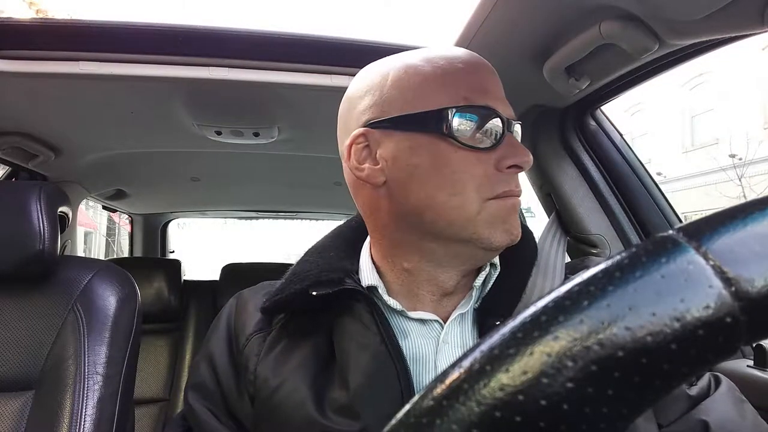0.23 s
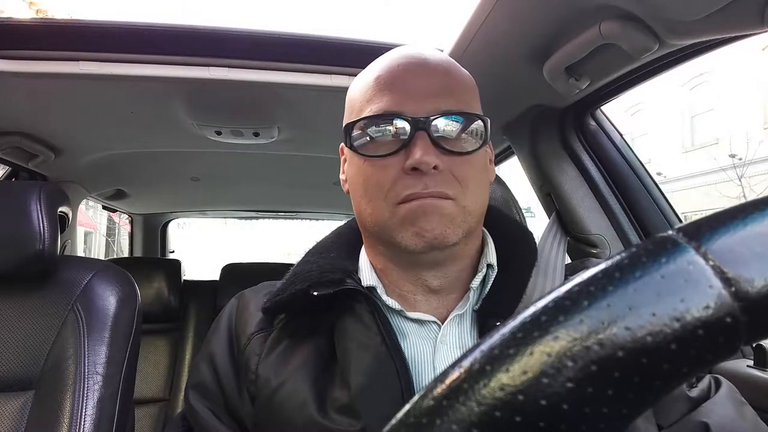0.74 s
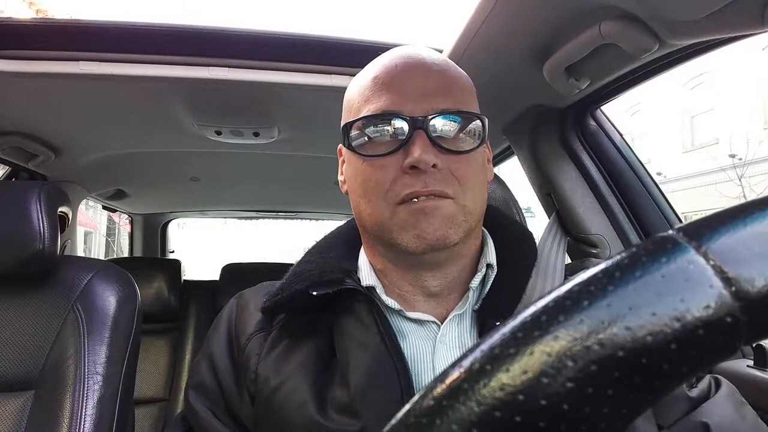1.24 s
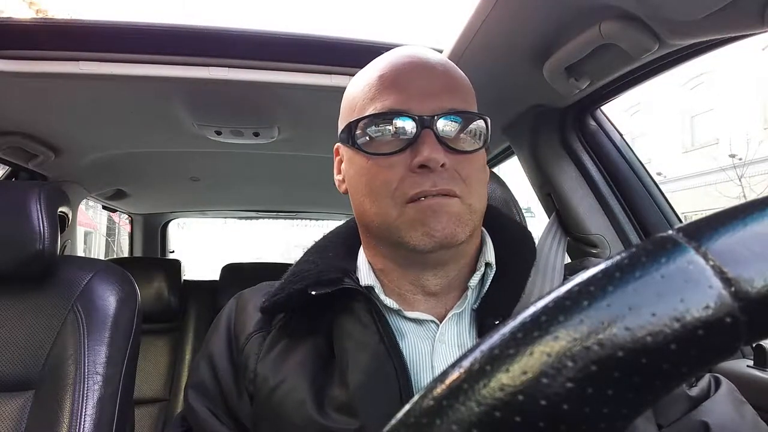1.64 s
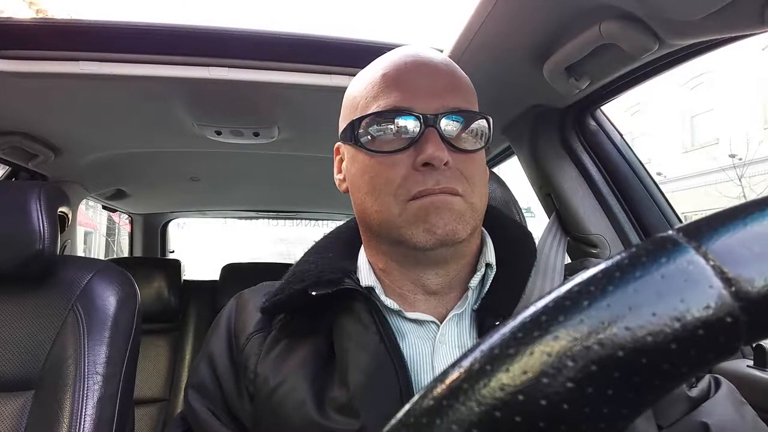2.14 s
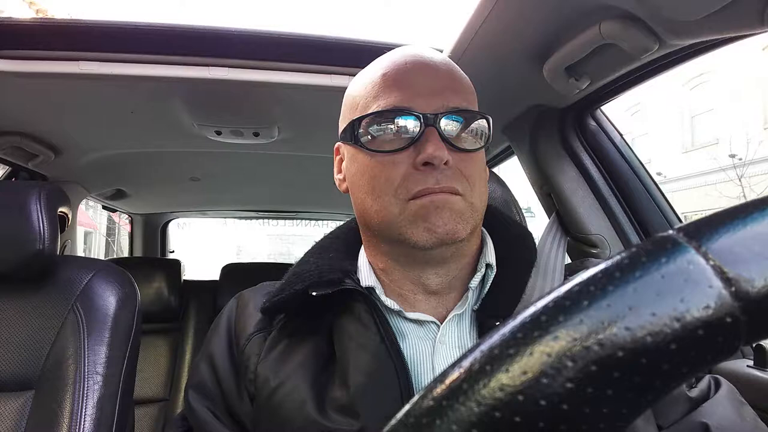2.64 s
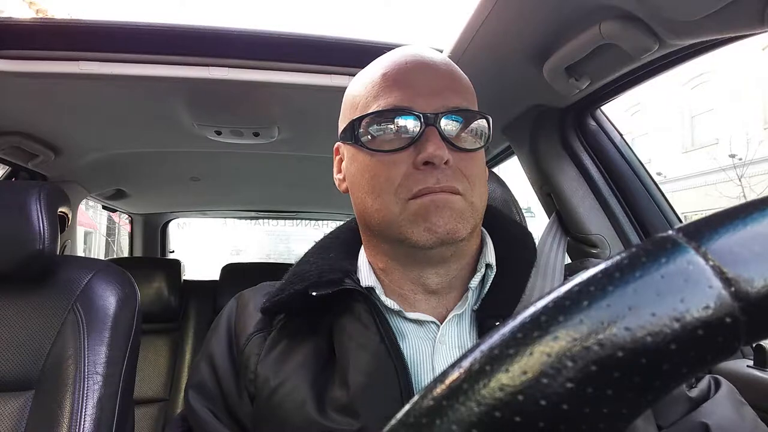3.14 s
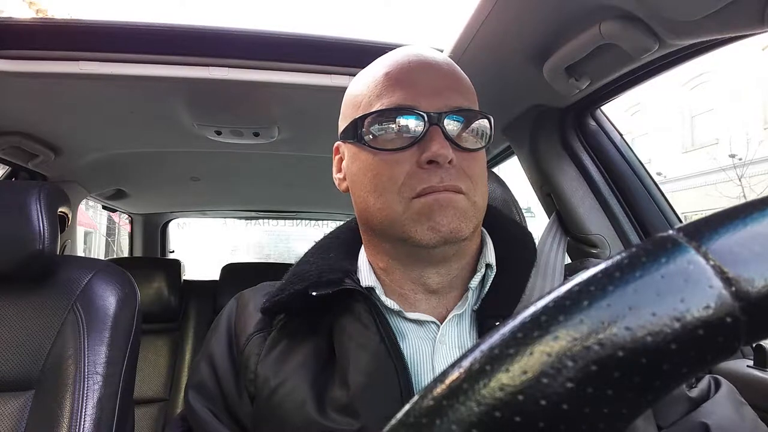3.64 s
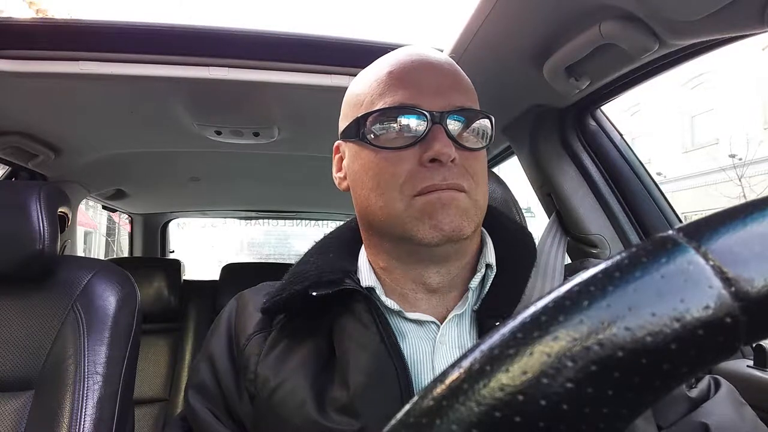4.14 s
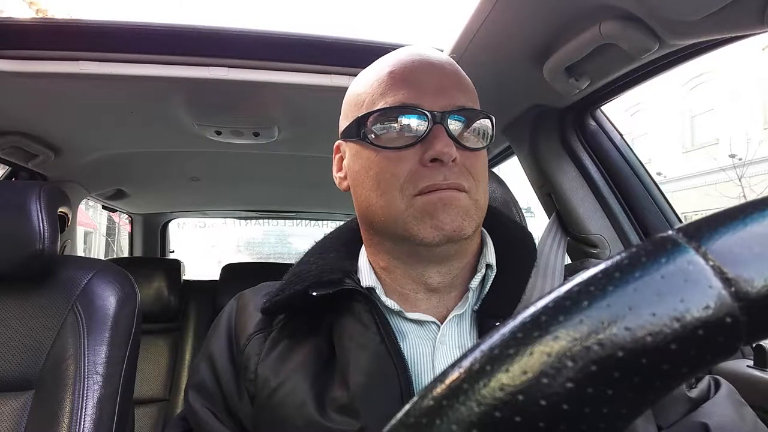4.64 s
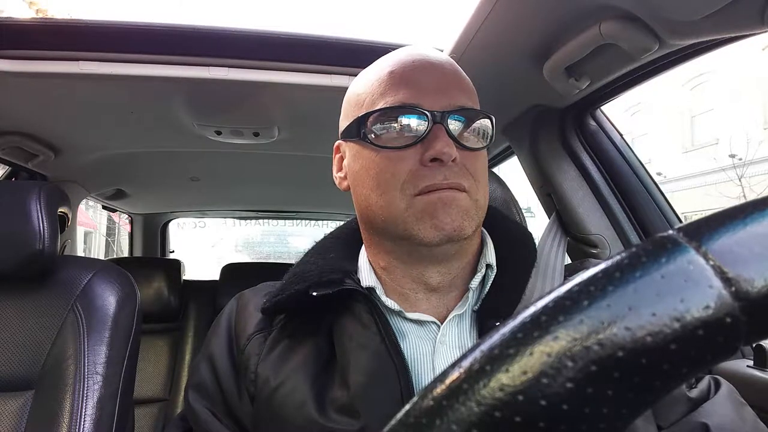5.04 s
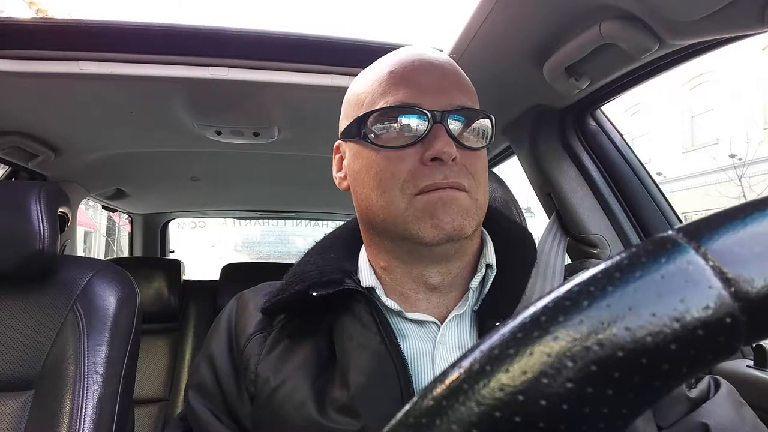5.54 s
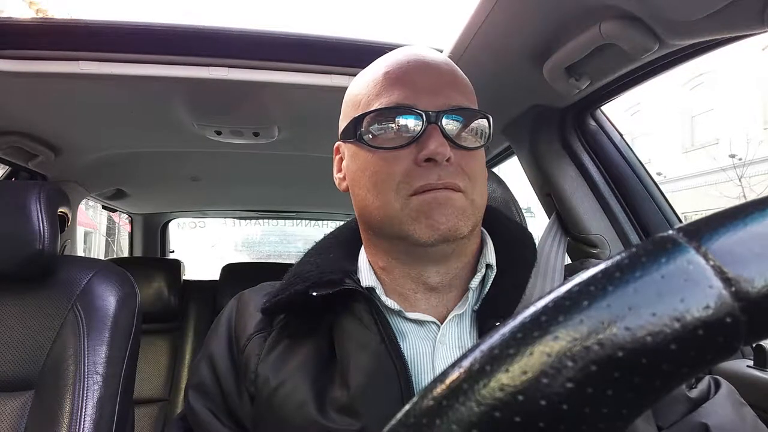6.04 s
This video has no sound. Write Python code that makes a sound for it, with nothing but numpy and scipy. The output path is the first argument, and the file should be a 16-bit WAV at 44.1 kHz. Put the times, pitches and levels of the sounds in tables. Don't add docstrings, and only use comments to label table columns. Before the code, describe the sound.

Inside a parked car with an open window, a pneumatic breaker hammers the road nearby, already running at 0 s and lasting to about 6.3 s. Blows come about nineteen a second, slightly uneven in strength: a bright, ringing steel crack with a sharp spit of exhaust air, a lighter piston knock some 20 ms before it, and a low thud and boom in the cabin. Panels, door and window glass rattle and buzz. Around 1.1 s two blows weaken, a gap of under 0.2 s follows, and at 1.36 s the hammering resumes. From 3 s the top rings more freely and the blows sound deeper-set; from 5.6 s they slow to about sixteen a second, brighter and thinner. Street echo fills the gaps; a faint diesel drone swells near 3.5 and 4.5 s over distant town rumble. Small stereo microphone, tool slightly left.

```python
import sys
import numpy as np
from scipy import signal
from scipy.fft import rfft, irfft, next_fast_len
from scipy.io import wavfile

SR = 44100
rng = np.random.default_rng(int(sys.argv[2]) if len(sys.argv) > 2 else 0)


def gain_from_db(level_db):
    decades = np.asarray(level_db, float) / 20
    return 10 ** decades


def transcribe(u):
    v = np.clip(np.atleast_2d(u).T, -1, 1)
    q = np.round(v * 32767).astype(np.int16)
    wavfile.write(sys.argv[1], SR, q)


N = 277560

PAD = int(0.6 * SR)
SIZE = next_fast_len(N + PAD)
HZ = np.arange(SIZE // 2 + 1) * SR / SIZE + 1e-3
KNOCK_LEAD_S, PORT_LAG_S = 0.0215, 0.0002145
STREET_T60_S, TOP_T60_S, CABIN_T60_S = 0.44, 0.15, 1
TREBLE_ALIKE = 0.52
SHARED = rfft(rng.standard_normal(SIZE))
TURNS = np.interp(HZ, 450 * np.arange(50), 2.0 * rng.standard_normal(50)) / (1 + (1500 / HZ) ** 2)
OWN = rng.standard_normal((2, SIZE))


def filt(x, response):
    return irfft(rfft(x, SIZE) * response, SIZE)


def delay(s):
    return np.exp(-2j * np.pi * HZ * s)


def peak(hz, width):
    return 1j * HZ * width / (hz ** 2 - HZ ** 2 + 1j * HZ * width)


def body(modes):
    total = 0
    for k, (hz, width, *db) in enumerate(modes):
        total = total + (-1) ** k * gain_from_db(np.array(db))[:, None] * peak(hz, width)
    return total


def colour(points):
    hz, db = np.transpose(points)
    return gain_from_db(np.interp(np.log(HZ), np.log(hz), db))


def level(x, db):
    return x * gain_from_db(db) / np.sqrt(np.mean(x ** 2))


def mean_db(db):
    return 10 * np.log10(np.mean(gain_from_db(db) ** 2))


def at(s, curve):
    when, *columns = np.transpose(curve)
    return [np.interp(s, when, c) for c in columns]


def common():
    drift_hz, drift_above_hz = 0.3374, 1900
    left = SHARED * np.exp(1j * TURNS)
    high = 1 / (1 + (drift_above_hz / HZ) ** 4)
    turn = 2 * np.pi * drift_hz * np.arange(SIZE) / SR
    paths = [left * (1 - high), left * high, 1j * left * high, SHARED * delay(PORT_LAG_S)]
    low, treble, shifted, right = irfft(paths, SIZE)
    return np.array([low + np.cos(turn) * treble + np.sin(turn) * shifted, right])


def pair(alike, shared):
    noise = np.sqrt(alike) * shared + np.sqrt(1 - alike) * OWN
    return np.roll(noise, rng.integers(SIZE), axis=1)


def ports():
    return np.array([delay(0), delay(PORT_LAG_S)])


def train(times, db):
    x = np.zeros(SIZE)
    x[np.round(times * SR).astype(int) + PAD] = gain_from_db(db)
    return x


def burst(clicks, rise_s, fall_s):
    rise, fall = np.exp(-1 / (rise_s * SR)), np.exp(-1 / (fall_s * SR))
    return signal.lfilter([1 - rise], np.convolve([1, -rise], [1, -fall]), clicks)


def street(clicks, t60):
    return np.sqrt(np.abs(burst(clicks ** 2, 0.043, t60 / np.log(1e6))))


def diesel():
    cycle_hz, steady_db = 14.45, -29
    # multiple of the cycle rate, level in dB
    lines = [(2, -28), (3, -8), (4, -5), (5, -12.5), (6, -6), (8, -6)]
    # time in seconds, level of the lowest firing lines in dB
    load = [
        (0, -29),
        (1, -34),
        (1.3, -31),
        (2.3, -42),
        (3.5, -24.5),
        (4.3, -31),
        (4.55, -22.5),
        (4.85, -30),
        (6.29, -27),
    ]
    wander = filt(rng.standard_normal((len(lines) + 1, SIZE)), 1 / (1 + 1j * HZ / 0.47) ** 2)
    wander /= wander.std()
    load_db, = at((np.arange(SIZE) - PAD) / SR, load)
    phase = 2 * np.pi * np.cumsum(cycle_hz * (1 + 0.0063 * wander[0])) / SR
    out = 0
    for (k, db), w in zip(lines, wander[1:]):
        line_db = db + (load_db if k < 5 else steady_db) + 1.5 * w
        out = out + gain_from_db(line_db) * np.sqrt(2) * np.sin(k * phase + k ** 2)
    return out


def traffic(shared):
    # frequency in Hz, level in dB per Hz
    rumble = [(20, -33), (60, -19), (150, -22), (300, -15), (700, -19.5), (1500, -26), (8000, -41),
              (15000, -77)]
    return level(filt(pair(1.0, shared), colour(rumble)), -37)


def strikes():
    # time in seconds, crack over the force in dB, thud over the force in dB
    early = [(0.0336, 6.5, 0), (0.088, 2, 4.5), (0.1399, 0, 2), (0.1916, 5, -1), (0.2448, -1, 2),
             (0.2972, -4, -0.5), (0.348, 0.5, -2), (0.4016, -3, 0.5), (0.4534, -6, 2.5), (0.5052, -2, 2),
             (0.5606, -2, 0.5), (0.6114, -1.5, -0.5), (0.6653, -2, 1), (0.718, -8, -2), (0.7699, 6, -0.5),
             (0.824, -4, -5), (0.8813, -2, 2), (0.93, -3, 0.5), (0.984, 0, -1), (1.0373, 2.5, 2),
             (1.0957, -16, -2), (1.1743, -16, 2), (1.3632, 4.5, 1.5), (1.419, -9, -0.5), (1.471, -9, 2.5),
             (1.5208, -3, 0.5), (1.5732, 0, -0.5), (1.6239, 6, 3), (1.6774, 3, 2), (1.7278, -3, 4.5),
             (1.7801, 1, -2.5), (1.8313, 4.5, 2.5), (1.8834, -4, 4), (1.9344, 0, 1), (1.9879, -2, 3),
             (2.0405, -2, -6), (2.0929, -3, 1), (2.147, -6, -2), (2.199, -3, 0), (2.25, 5, 1),
             (2.3048, -3, 1.5), (2.3558, -6, 3.5), (2.4071, -4, 1.5), (2.4599, -2, 1.5), (2.514, -6, 2.5),
             (2.565, 2.5, -1), (2.6176, -7, 0), (2.671, -8, 0.5), (2.7207, 3, -1.0), (2.773, -2, -3),
             (2.8239, -7, 4), (2.877, 3, 1.5), (2.9274, 3, 2), (2.9799, -6, 0.5), (3.0312, -9, -0.5),
             (3.0823, -2, -2), (3.1332, 4, 1), (3.1846, -2.5, 0.0)]
    # time in seconds, crack over the force in dB, thud over the
    # force in dB
    late = [(3.2388, -4, 3), (3.2912, 5.5, -2), (3.341, -3, 0.0), (3.3933, -3.5, 0.5), (3.4448, 1, -3),
            (3.4954, 1, 0), (3.5472, -9, -2), (3.5987, -9, 0.5), (3.6498, -2, 1.5), (3.7024, -1.5, -0.5),
            (3.7561, -7, 0), (3.8076, -8, -6), (3.8607, -17, -2), (3.912, -1, 0), (3.9648, -8, 0),
            (4.0168, 2, 0), (4.07, -2, 1), (4.1237, -3, -1.5), (4.176, 5, 3), (4.229, 4.5, 0.5),
            (4.2825, -6, 3), (4.337, -7, 2.5), (4.3929, 4, 1.5), (4.4482, -0.5, 0), (4.5017, -6, 2.5),
            (4.5553, 0, 1), (4.6096, -5, 2.5), (4.6651, 6, 2), (4.7179, -3.5, 3), (4.7724, -3, -1),
            (4.825, 3, 2.5), (4.8789, 1, 2), (4.9329, 2, 0), (4.9882, 1, 3), (5.043, -5, -0.5),
            (5.0999, -7, 0), (5.1557, 1, 0.5), (5.2103, 1, 1), (5.2618, 3, -2), (5.3176, -8, 0),
            (5.3726, -3.5, 1.5), (5.4254, -5, -1.5), (5.4801, 2, -0.5), (5.5374, -6, 1), (5.5899, -9, -1.5),
            (5.6541, -4, 3.5), (5.7139, -10.5, -0.5), (5.7755, -7.5, -0.5), (5.8369, 0, 2.5),
            (5.9002, -11, 1.5), (5.9608, -6, 3.5), (6.0201, -12, 4.5), (6.0882, -2, 4.5),
            (6.1451, -5.5, 2.5), (6.2215, 0, 3), (6.2796, 3, 2.5)]
    s, crack_db, thud_db = np.transpose(early + late)
    before = np.arange(10, 0, -1)
    run_in = s[0] - (s[1] - s[0]) * before
    return np.r_[run_in, s], np.r_[0 * before, crack_db], np.r_[0 * before, thud_db]


def knocks():
    # knock lead in ms, knock in dB, window pane in dB
    early = [(18.6, 1.0, -7), (23.3, -1, -9), (20.5, -1.0, -3.5), (19.9, 0, 0.5), (20.8, -6, 1),
             (18.7, -1, 3), (17.8, -1, 3.5), (21.3, 1, -1), (22.2, 3.5, -8), (21.7, 1, -0.5), (23.4, -2, 0),
             (22.4, -2, 0), (22, -0.5, -2), (21.7, -3, 1), (20.2, 1.0, -1), (23.8, 0, -3.0), (21.8, -3, 2),
             (20.5, -3, 1.5), (20.1, 1.0, -3.0), (20.9, 2, -3.5), (25.4, 2.5, -5), (22.8, -19, -5.0),
             (24.9, -18, 0), (23.5, 1, 2.5), (21.4, 2, 1.5), (18.0, 3, 0), (18.2, 3, -2.5), (19.3, 2, 4),
             (22.5, -4, -1.5), (19.6, -6, -9), (21.5, 0, 1.5), (17.8, -2, -2.0), (19.4, 3, -7),
             (19.3, -1.0, 1), (21.3, 2.5, 1), (18.9, 5, 1.5), (22, 4, -1), (22.7, 2.5, -0.5), (20.6, 2, 2),
             (18.7, 0, 2.5), (22.3, 1, 1), (20.4, -1, 1), (18.4, -1, 2.0), (19.7, 1, 4.5), (23.4, -0.5, 4),
             (19.6, 2, 6), (22.3, -8, 7), (23.3, -2, 3.5), (19.6, -4, -3), (20.3, 2, 3.5),
             (18.2, -0.5, 3.5), (21.9, 2, 3), (19.1, -5, 4), (20.8, -5, 4), (19.5, 1.0, 4), (21.5, 0, 2),
             (18.4, 3, 1.0), (17.8, -3, 3)]
    # knock lead in ms, knock in dB, window pane in dB
    late = [(22.3, 1, 3.5), (21.6, 0, 2), (18.0, -0.5, 3), (20.4, -4, -1), (19.3, -1, 2.5), (19.6, -6, -6),
            (21.1, -3, 3), (21.9, 1.5, 3.0), (20.3, 2, 4), (21.6, 3.5, -11), (21.3, 5, 3), (20.1, -1, -4.0),
            (21, 4.5, 7), (20.8, 2, 6), (21.2, 1, 1.5), (21.6, 0, -1), (22.7, -2.0, 5.5), (22.3, 2.0, -14),
            (21.5, 2, -5), (20.9, 1.5, -5), (22.5, -3, 1.5), (23.1, 1, 2.5), (23.2, 1, -0.5),
            (24.5, 3, 0.0), (22.4, -3, 1), (23.6, -0.5, 0), (20.7, -10, -3), (23.4, 4, -3),
            (21.8, -4.0, 0.5), (22.9, 2, 2), (20.8, 2, -2), (21.7, -5, 0), (21.7, -10, -7), (20.8, -9, -11),
            (23.5, 3, 0), (23.9, 3, 0.0), (24.5, 3, -12), (23.3, 0, 4), (20.2, -1.5, -0.5),
            (21.0, -2.5, -1), (19.6, 0, -8), (20.3, 0, -1), (19.5, -1.5, 0), (21.2, 0, 1.5), (20.1, -6, 2),
            (22.2, 1.0, -4), (21.5, 1, 0), (20.1, -2.5, 3.5), (20.7, -3.5, 0), (22, 0.5, 2.5),
            (22.4, 0.0, 0), (21.0, 2, -5.0), (24, 1, 0), (19.6, -0.5, -9), (22.7, 1.0, 0.5), (19.0, 1, -7)]
    rows = np.transpose(early + late)
    lead_ms, knock_db, pane_db = np.pad(rows, ((0, 0), (10, 0)), mode="edge")
    return lead_ms / 1000, knock_db, pane_db


def answer(s, over_db, firm_db, depth_db, scatter_db):
    # time in seconds, blow force in dB, ground firmness 0-1, chisel depth 0-1
    work = [(0, -26, 1, 0), (.5, -23.5, 1, 0.01), (1.04, -24, 1, 0.02), (1.09, -22.5, 0.8, .01),
            (1.18, -32, 0.6, .01), (1.36, -25, 0.75, 0.15), (1.42, -21.5, 0.22, 0.11),
            (1.7, -23.5, 0.24, 0), (2.4, -21.5, 0.13, 0.11), (3, -22, 0.45, 0.25), (3.9, -19, 0.19, 0.39),
            (4.15, -21, 0.85, 0.54), (4.7, -22, 1, 0.46), (5.45, -21.5, 1, 0.47), (6, -20, 0.73, 0.86),
            (6.29, -22.5, 0.68, 0.5)]
    force_db, firm, depth = at(s, work)
    return force_db + over_db + firm_db * firm + depth_db * depth + scatter_db * rng.standard_normal(len(s))


def crack_answer(s):
    return answer(s, 0.1, 0.087, 0.1, 0.036)


def with_knock(db, early_s=0.0):
    return 1 + gain_from_db(db) * delay(-KNOCK_LEAD_S - early_s)


def shake(s, db, modes, rough_db, tail_db, alike, echo, shared):
    push = train(s, db)
    rough = gain_from_db(rough_db) * burst(push, 0.00036, 0.0035)
    tail = gain_from_db(tail_db) * street(push, CABIN_T60_S)
    noise = (rough + tail) * pair(alike, shared)
    return level(irfft((rfft(push) * echo + rfft(noise)) * modes, SIZE), mean_db(db))


def boom(s, shared):
    # frequency in Hz, width in Hz, left in dB, right in dB
    air_modes = [(61.2, 2.06, -3, 5.5), (131.2, 23.5, -2, -2.5), (159.6, 26.6, 3, 3), (187, 68, -5, -2.5)]
    # frequency in Hz, width in Hz, left in dB, right in dB
    floor_modes = [(152.9, 10.2, -5.5, -7)]
    # time in seconds, what the slab passes on to the cabin floor in dB
    coupling = [(0, -26), (.5, -27.5), (.9, -27.5), (1.3, -30), (1.5, -30), (1.62, -23.5), (1.75, -36),
                (1.95, -35), (2.15, -25), (2.75, -28), (2.92, -34.5), (3.05, -27), (3.5, -27), (3.75, -30),
                (4.1, -28), (4.5, -23.5), (5.2, -32), (6.29, -27)]
    both = with_knock(0.0, 0.004)
    modes = body(air_modes) * peak(126.0, 320.0) * delay(-0.00817)
    out = shake(s, answer(s, -2, 1, -3.5, -0.5), modes, -30, -31, 0.94, both, shared)
    hum_db = answer(s, -4.5, 0, -7.5, 0.4) + 1.66 * (at(s, coupling)[0] + 27.6)
    modes = body(floor_modes) * peak(142.0, 98.0) * delay(-0.00618)
    return out + shake(s, hum_db, modes, -56, -36.5, 0.69, both, shared)


def thud(s, thud_db, shared):
    # frequency in Hz, width in Hz, left in dB, right in dB
    low_modes = [(243.3, 16.6, -5.5, 2.2), (294.7, 32, 0.5, 0.5)]
    # frequency in Hz, width in Hz, left in dB, right in dB
    high_modes = [(360, 123, 4.5, 0), (423.3, 84, 0, 0.2)]
    knocked = with_knock(-15.0)
    low_db = answer(s, -3.5, 13.5, -6.5, 0) + thud_db - 11.0
    high_db = answer(s, -0.5, 0.5, -9, -0.7) + thud_db - 7.0
    modes = body(low_modes) * peak(310.6, 133.0) ** 2 * delay(-0.00531)
    out = shake(s, low_db, modes, -47.0, -38.5, 0.84, knocked, shared)
    modes = body(high_modes) * peak(346.0, 230.0) ** 2 * delay(-0.00267)
    return out + shake(s, high_db, modes, -32, -36.5, 0.77, knocked, shared)


def door(s, shared):
    # frequency in Hz, width in Hz, left in dB, right in dB
    door_modes = [(470, 44, 0, 4), (880, 120, -1, -6), (990, 78, 1, 1)]
    rattle_db = answer(s, -29.5, 14, -18, 1.5)
    return shake(s, rattle_db, body(door_modes) * delay(-0.002), -16, -36.5, 0.58, ports(), shared)


def panels(s, shared):
    # frequency in Hz, width in Hz, left in dB, right in dB
    sheet_modes = [(612, 70, 0.63, -0.5), (724, 48, 0.5, -3)]
    # frequency in Hz, width in Hz, left in dB, right in dB
    trim_modes = [(820, 45, -2.5, -0.5), (1032, 173, -5, -4.5), (1470, 47, -14.5, -10),
                  (2310, 79, -19, -9.5)]
    panel_db = answer(s, -10, 4.5, -23, -0.5)
    repeats = np.array([delay(0.00982), delay(0.0113)])
    echo = (with_knock(-3, 0.005) + gain_from_db(3.0) * repeats) * ports()
    modes = body(sheet_modes) * peak(687.0, 340.0) * delay(-0.00094)
    out = shake(s, panel_db, modes, -34, -29.5, 0.33, echo, shared)
    echo = (with_knock(2.0, 0.008) + gain_from_db(5) * delay(0.00595)) * ports()
    modes = body(trim_modes) * delay(0.0015)
    return out + shake(s, 0.29 * panel_db - 29.5, modes, -14, -23.5, 0.57, echo, shared)


def window(s, shared):
    # frequency in Hz, width in Hz, left in dB, right in dB
    pane_modes = [(1157, 42, 5, 2.5)]
    # frequency in Hz, width in Hz, left in dB, right in dB
    sunk_modes = [(1097, 40, 4.4, 1.6)]
    # frequency in Hz, width in Hz, left in dB, right in dB
    seal_modes = [(1451, 70, 2, 2)]
    glass_lag_s, glass_echo_s, both = 0.003, 0.0125, ports()
    pane_db = knocks()[2]
    glass = body(pane_modes) * peak(1160.0, 103.0)
    glass_db, echo_db = -41.5 + 1.57 * pane_db - 2.5, -52.5 + 0.86 * pane_db
    out = shake(s, glass_db, glass * delay(glass_lag_s), -28, -41.5, 0.28, both, shared)
    out += shake(s, echo_db, glass * delay(glass_echo_s), -27, -42, 0.25, both, shared)
    sunk_db = answer(s, -36, 3.5, 16.5, 3) + 0.6 * pane_db
    modes = body(sunk_modes) * peak(1113.0, 130.0) * delay(glass_lag_s)
    out += shake(s, sunk_db, modes, -14, -29.5, 0.66, both, shared)
    modes = body(seal_modes) * peak(1530.0, 160.0) * delay(0.007)
    return out + shake(s, answer(s, -30, 0, 8, 1), modes, -28, -48, 1.0, both, shared)


def cylinder_head(s, lead_s, knock_db, shared):
    # frequency in Hz, width in Hz, level in dB
    head_modes = [(11130, 130, -3.5), (11460, 116, -2), (12200, 130, -9)]
    # time in seconds, ring of the head in dB
    grip = [
        (0, -5.5),
        (2.4, -2),
        (3, 1.5),
        (4.1, 3),
        (4.5, -2),
        (6.29, 3),
    ]
    clicks = train(s - lead_s, knock_db + at(s, grip)[0] + 31.0)
    modes = sum(gain_from_db(db) * peak(hz, width) for hz, width, db in head_modes)
    return filt(burst(clicks, 0.00057, 0.0014) * pair(TREBLE_ALIKE, shared), modes)


def contacts(s, crack_db, knock_db, lead_s):
    touch_lead_s, touch_db = 0.0026, -9
    bounce_s, bounce_scatter_s, bounce_db = 0.0176, 0.0064, -16.5
    touch_chance, wall_chance, level_chance, bounce_chance = rng.standard_normal((4, len(s)))
    bounce_at = np.minimum(s + bounce_s + bounce_scatter_s * bounce_chance, (N - 1) / SR)
    grit = filt(rng.standard_normal(SIZE), peak(290.0, 710.0))
    grit = gain_from_db(2.06 * grit / grit.std())

    def contact(db, rise_s, fall_s, knock_rel_db, tail_db, t60=STREET_T60_S, echo_s=0.0048):
        hit_db = crack_db + db
        blow = train(s, hit_db)
        clicks = blow + train(s + echo_s + 0.0014 * wall_chance, hit_db - 8 + 3 * level_chance)
        clicks += train(s - lead_s, knock_db + db + knock_rel_db)
        clicks += train(s - touch_lead_s, hit_db + touch_db + 1.08 * touch_chance)
        clicks += train(bounce_at, hit_db + bounce_db + 3.0 * level_chance)
        return grit * burst(clicks, rise_s, fall_s) + gain_from_db(tail_db) * street(blow, t60)

    return contact


def chisel(contact, bright_db, upper_db, shared):
    # frequency in Hz, width in Hz, level in dB
    steel = [(3960, 8.1, -2), (4180, 62, -7.5), (4440, 73, -3.5), (4783, 37, -3), (5234, 55, -5),
             (5760, 29, 0.5), (6300, 73, -2.5), (6630, 106, -3.5), (7205, 70, 1.5), (7585, 50, 1),
             (8330, 180, 4.5), (8800, 25, -21), (9320, 40, 0.5), (9630, 82, 3.5), (10570, 200, 1.5),
             (11100, 120, -16), (11570, 170, -2), (12200, 250, -8), (13500, 65, -11), (13900, 200, -9),
             (14600, 57, -21)]

    def ring(lo_hz, hi_hz, half=None):
        return sum((-1) ** (k // 2) * gain_from_db(db) * peak(hz, width) for k, (hz, width, db) in enumerate(steel)
                   if lo_hz < hz <= hi_hz and half in (None, k % 2))

    out = 0
    for half in range(2):
        wake_db = 4 * rng.standard_normal((2, len(bright_db)))
        main = contact(15.0 + wake_db[0], 0.00065, 0.0031, 1.0, -15.5)
        out += filt(main * pair(0.26, shared), ring(0, 7900, half))
        top_db = bright_db + 31.5 + 0.5 * wake_db[1]
        top = contact(top_db, 0.00046, 0.0036, 4.5, -10.5, TOP_T60_S, 0.0054)
        modes = ring(9900, 16000, half) + 0.22 * peak(9600.0, 8800.0) ** 2
        out += filt(top * pair(TREBLE_ALIKE, shared), modes)
    upper = contact(upper_db + 27.5, 0.00083, 0.0041, 5.8, -43)
    return out + filt(upper * pair(TREBLE_ALIKE, shared), ring(7900, 9900))


def exhaust(contact, low_air_db, shared):
    # frequency in Hz, level in dB per Hz
    air = [(880, -12), (1500, -7), (1880, -11.5), (2330, -13), (2680, -21.5), (3330, -4.5), (3710, -7.5),
           (8550, 2.5), (12800, -16), (14800, -13), (15900, -38)]
    low = 1 / (1 + (HZ / 3500.0) ** 6)
    hiss_db = 5.0 + 2.5 * rng.standard_normal(len(low_air_db))
    hiss = contact(hiss_db, 0.002, 0.0027, 1.5, -4) * pair(0.84, shared)
    puff = contact(low_air_db, 0.0034, 0.0037, 1.0, -6) * pair(0.89, shared)
    return filt(hiss, colour(air) * (1 - low)) + filt(puff, colour(air) * low)


def shank(contact, shank_db, shared):
    modes = (peak(2953.0, 176.0) + 1.01 * peak(4020.0, 1460.0)) * peak(3220.0, 890.0)
    return filt(contact(shank_db + 26.5, 0.0016, 0.0061, -25, -7) * pair(0.39, shared), modes)


def tipped_shaft(contact, lean, shared):
    # frequency in Hz, width in Hz, level in dB
    shaft_modes = [(6980, 110, -2), (8820, 50, 2), (9460, 91, 2), (10070, 180, -0.5), (10530, 140, -2.5)]
    modes = sum((-1) ** k * gain_from_db(db) * peak(hz, width) for k, (hz, width, db) in enumerate(shaft_modes))
    hits = contact(2.0 + 17.3 * lean, 0.00048, 0.0016, 1.0, -7.5)
    return filt(hits * pair(TREBLE_ALIKE, shared), modes)


def steel_and_air(s, crack_db, shared):
    # time in seconds, how far the tool is tipped over 0-1
    tipping = [
        (0, 0.05),
        (5.55, 0),
        (5.75, 0.71),
        (6.29, 0.67),
    ]
    lean, = at(s, tipping)
    base_db = crack_answer(s)
    shank_db = answer(s, -19, -1, -21.5, 0.5) - base_db - 3.5 * lean
    bright_db = answer(s, -18.5, -1, -4.5, 0.5) - base_db + 3.5 * lean
    upper_db = answer(s, -13, 1.7, -28, 3.5) - base_db - 1.7 * lean
    low_air_db = answer(s, 4.9, 1.2, 5, 1.9) - base_db - 3.5 * lean
    lead_s, knock_db, _ = knocks()
    knock_db = -31.5 + 1.28 * knock_db
    paused = np.diff(s, prepend=s[0]) > 0.079
    knock_db = np.where(paused, np.minimum(knock_db, -48), knock_db)
    contact = contacts(s, crack_answer(s) + 0.33 * crack_db, knock_db, lead_s)
    out = cylinder_head(s, lead_s, knock_db, shared)
    out += chisel(contact, bright_db, upper_db, shared)
    out += exhaust(contact, low_air_db, shared)
    out += shank(contact, shank_db, shared)
    out += tipped_shaft(contact, lean, shared)
    return gain_from_db(np.array([[1.1], [-1.1]])) * out


def scene():
    # frequency in Hz, width in Hz, depth 0-1
    cabin_dips = [(89.5, 3.9, 0.5), (242, 6.6, 0), (519, 51, 1)]
    (s, crack_db, thud_db), shared = strikes(), common()
    out = traffic(shared)
    out += boom(s, shared) + thud(s, thud_db, shared)
    out += door(s, shared) + panels(s, shared) + window(s, shared)
    out += steel_and_air(s, crack_db, shared)
    dips = np.prod([1 - depth * peak(hz, width) for hz, width, depth in cabin_dips], axis=0)
    return (filt(out, dips) + diesel())[:, PAD:PAD + N]


def top_cut(x):
    return signal.sosfilt(signal.butter(12, 15870, fs=SR, output="sos"), x)


def record(dry):
    x = signal.sosfilt(signal.butter(1, 30, "high", fs=SR, output="sos"), dry)
    x = signal.sosfilt(signal.ellip(10, 0.2, 80, 15650, fs=SR, output="sos"), x)
    return top_cut(x)


dry = scene()
out = record(dry)
transcribe(out)
```